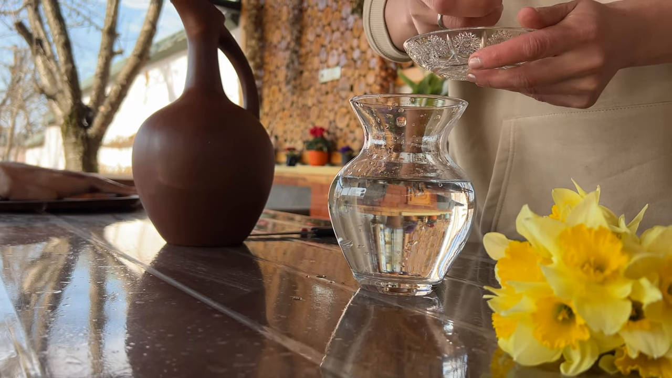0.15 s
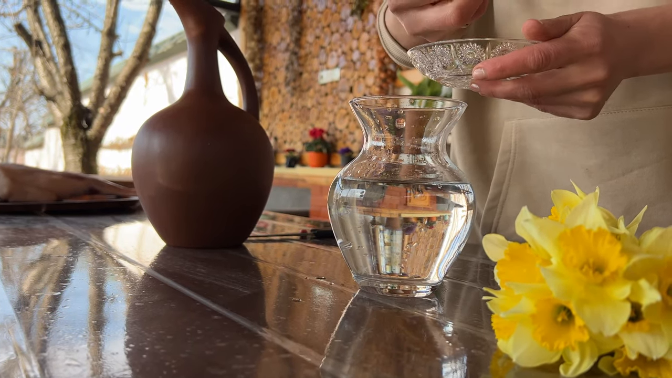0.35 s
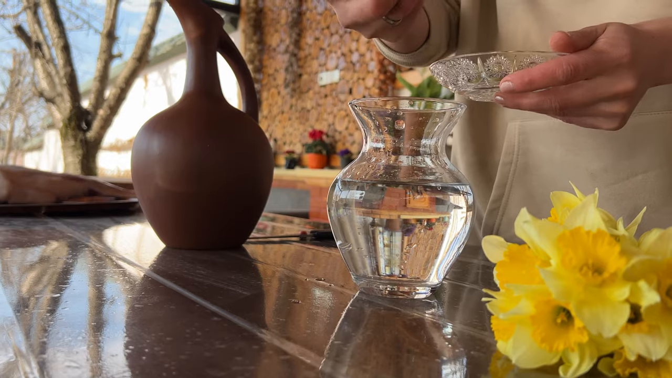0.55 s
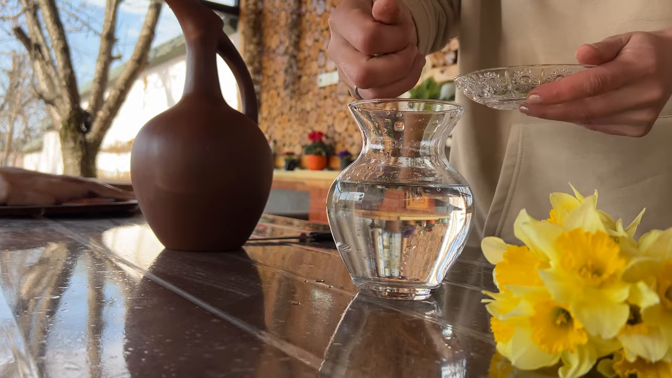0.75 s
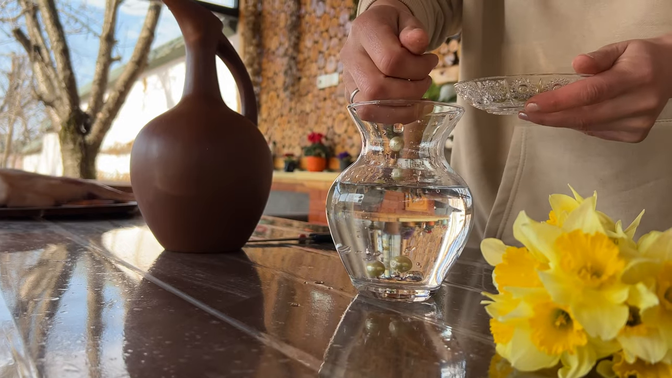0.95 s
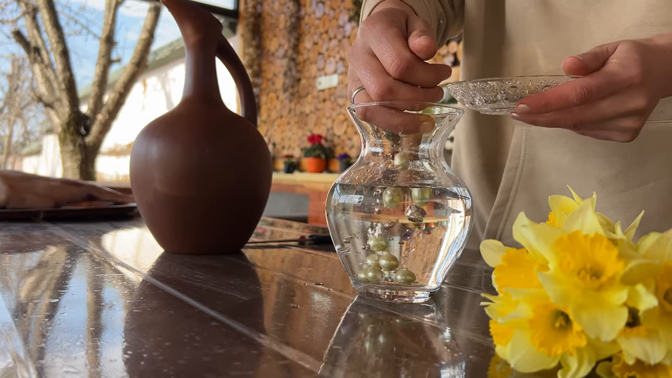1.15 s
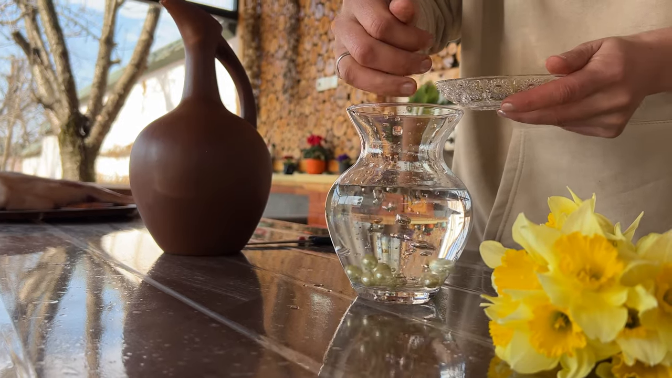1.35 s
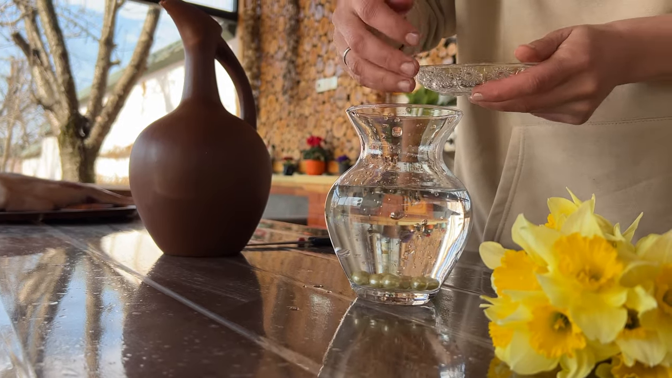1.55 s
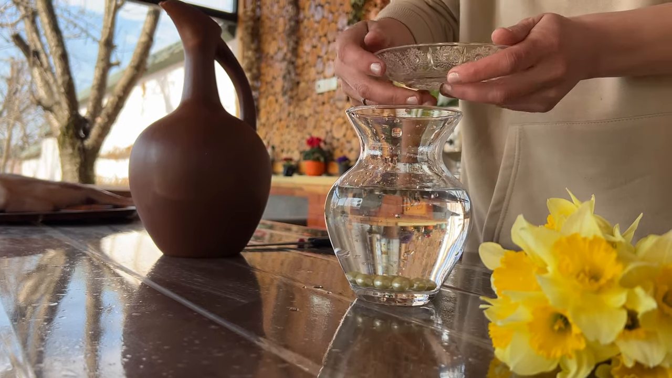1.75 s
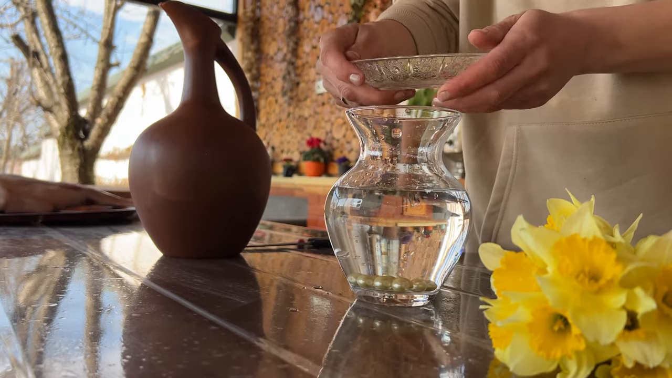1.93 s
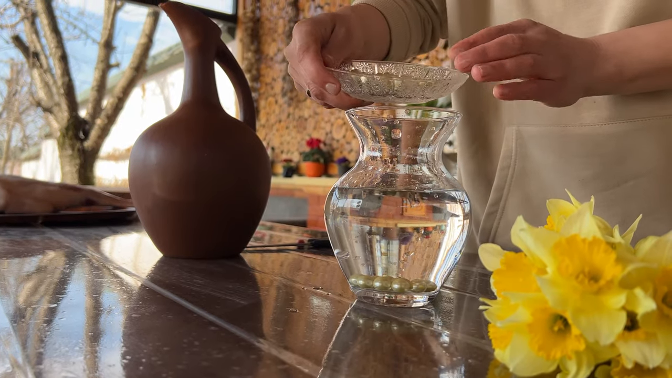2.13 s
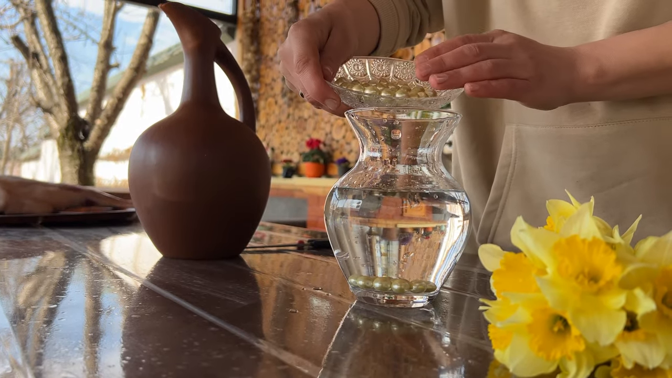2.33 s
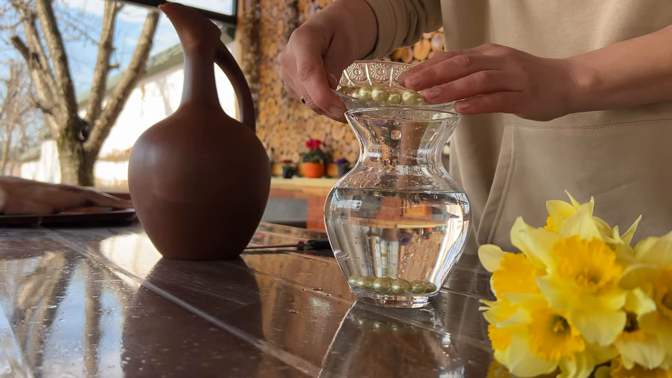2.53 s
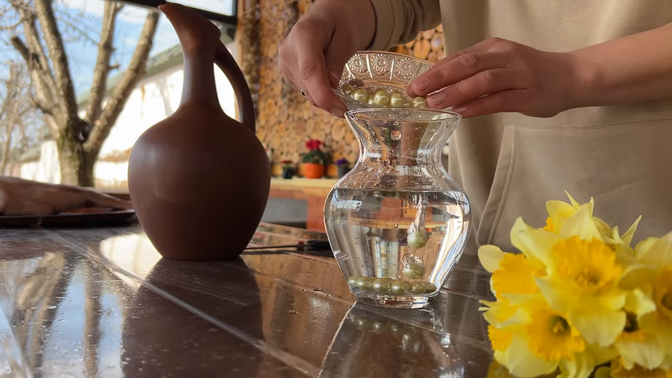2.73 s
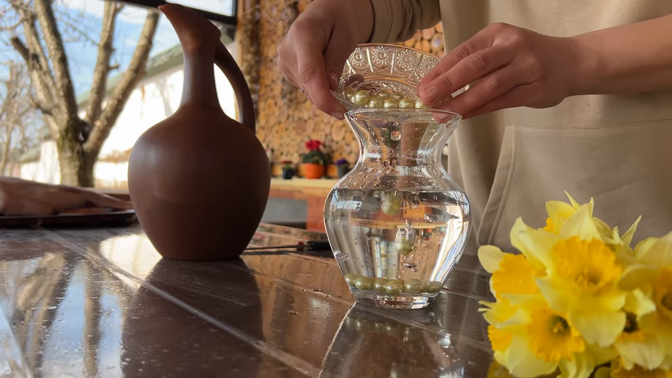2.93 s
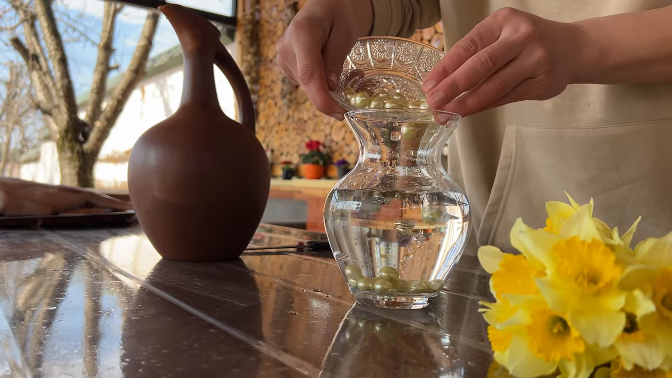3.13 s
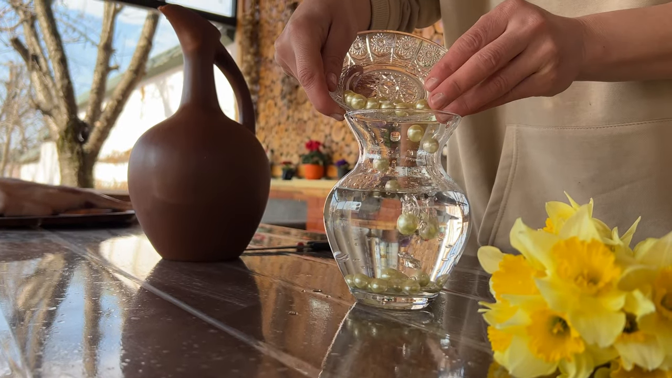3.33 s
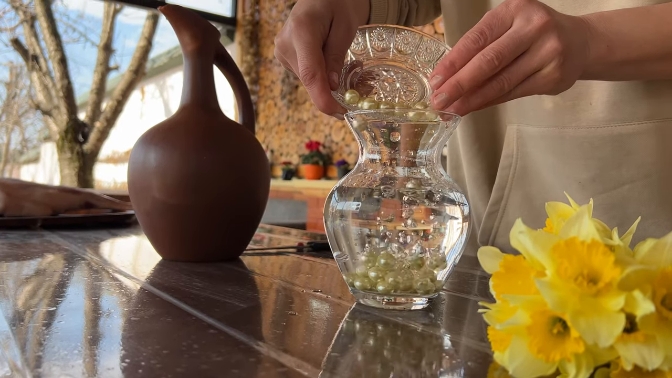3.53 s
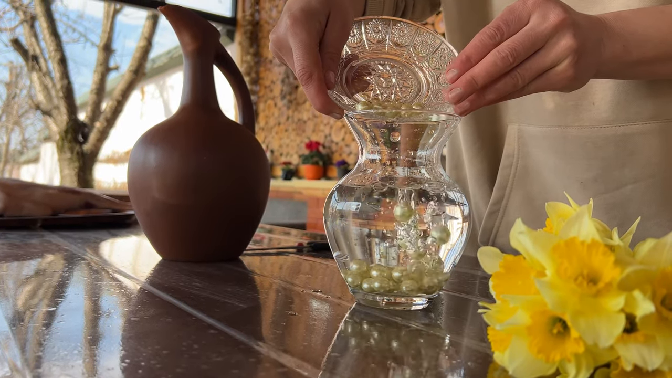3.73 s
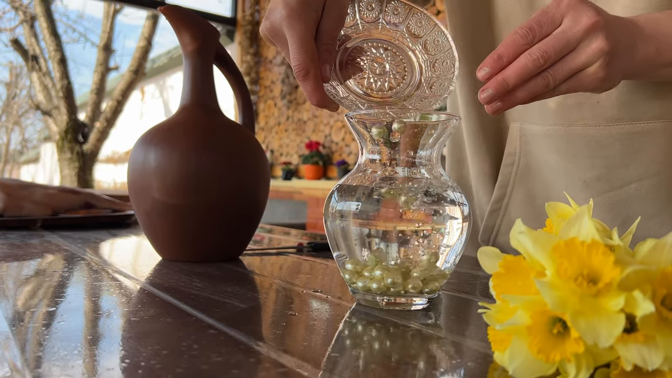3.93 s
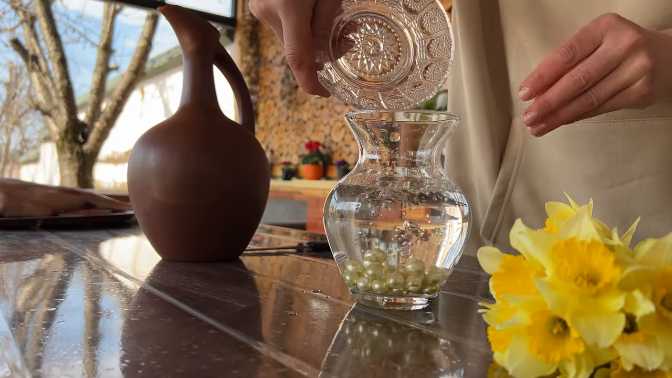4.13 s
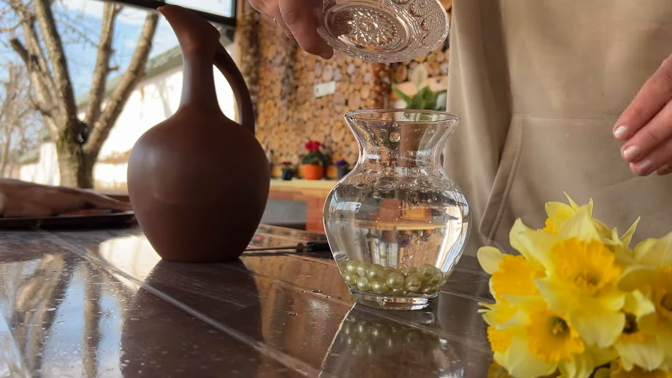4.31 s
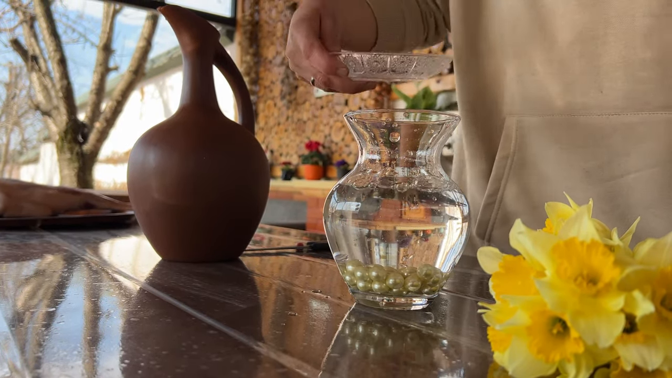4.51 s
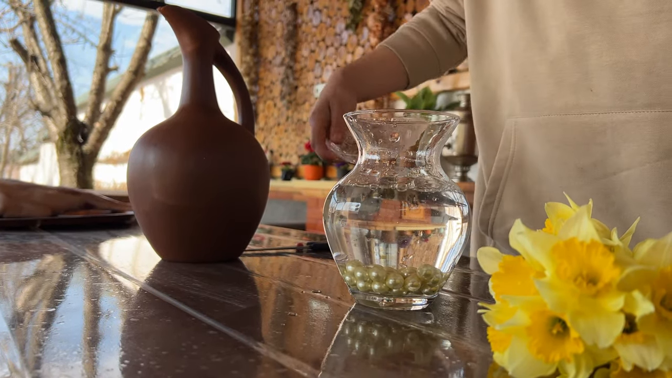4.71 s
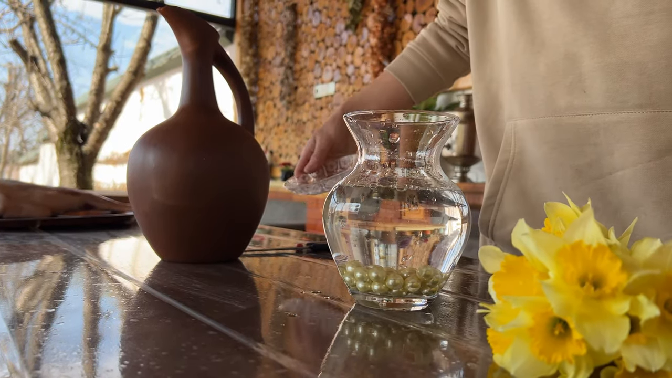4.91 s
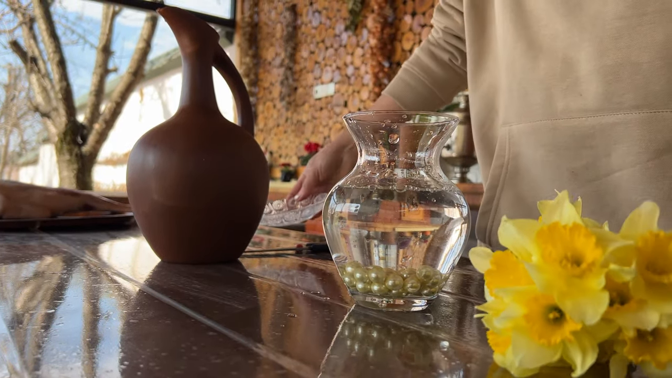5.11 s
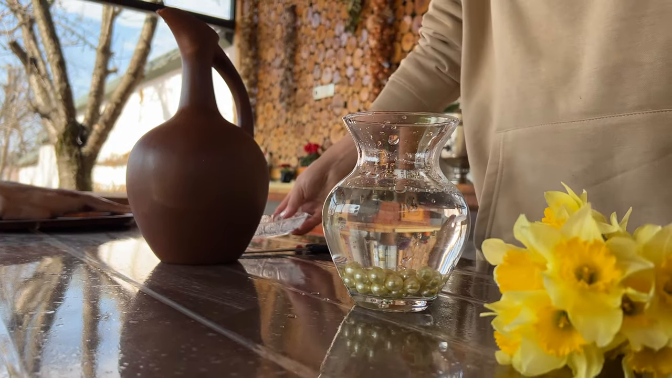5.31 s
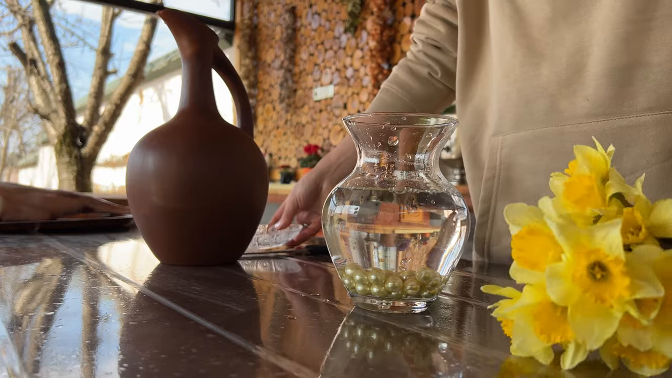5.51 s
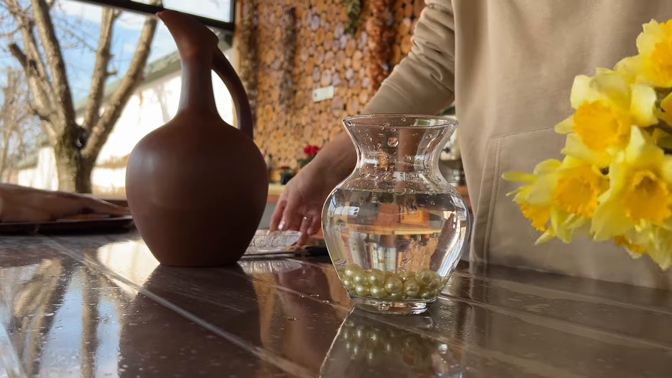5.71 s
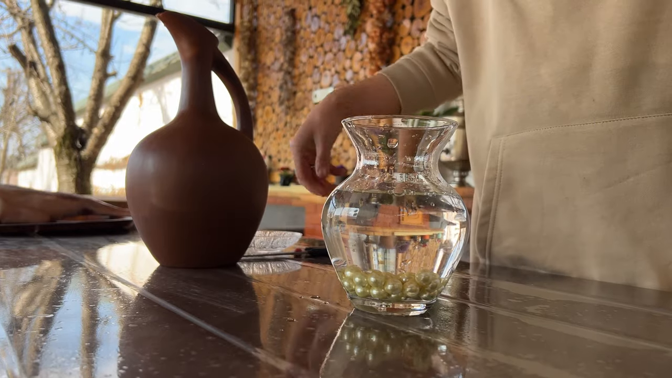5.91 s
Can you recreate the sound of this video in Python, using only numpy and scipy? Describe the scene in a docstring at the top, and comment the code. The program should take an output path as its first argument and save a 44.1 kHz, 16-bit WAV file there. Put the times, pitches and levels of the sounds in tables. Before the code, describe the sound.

Dry bead ticks and brisk dish clicks lead to a short watery clatter in a glass vase. The dish touches the lip, then a longer tumble of beads brings ringing clinks, hollow plops and fizzing bubbles. It thins to a few ticks, then a solid table knock, short scrape and faint sleeve rustle. Close microphone, short room reverberation, low distant engine hum.

```python
"""Pearl beads clicking in a small glass dish are heard first, over quiet room air and a far engine's hum.
Beads then drop into a glass vase of water, and the rest are tipped in; the dish is set down on the table.
Glass and wood sound as decaying modes behind a noise crack; bead on bead is a dry burst of noise.
Air pockets sing in the water as tones of rising pitch; rattle, churn and rustle are crowds of tiny events."""
import sys
import numpy as np
from scipy import signal
from scipy.fft import rfft, irfft, next_fast_len
from scipy.io import wavfile
from scipy.ndimage import uniform_filter1d

SR = 44100
rng = np.random.default_rng(int(sys.argv[2]) if len(sys.argv) > 2 else 0)


def persist_wave(psi):
    """Save psi, clipped to +-1, as 16-bit WAV."""
    counts = np.round(np.clip(psi, -1, 1) * 32767).astype(np.int16)
    wavfile.write(sys.argv[1], SR, np.atleast_2d(counts).T)


N = 267246
TIME = np.arange(N) / SR
RING = TIME[:SR // 4]  # time axis of one event [s]


def undb(db):
    """Level law: decibels to amplitude gain."""
    return 10 ** (np.asarray(db) / 20)


def unit(x):
    """Normalisation to an rms of 1."""
    return x / np.sqrt(np.mean(x ** 2))


def peak(x, db):
    """Onset level: the first 6 ms of a blow are scaled to the given rms level."""
    onset = x[:int(.006 * SR)]
    return x * undb(db) / np.sqrt(np.mean(onset ** 2))


def band(x, hz, kind, order=4):
    """Butterworth filtering: a maximally flat passband."""
    return signal.sosfilt(signal.butter(order, hz, kind, fs=SR, output="sos"), x)


def noise(colour, size):
    """Spectral shaping: white noise weighted by (frequency [Hz], level [dB]) points, rms 1."""
    hz, db = np.transpose(colour)
    n = next_fast_len(size)
    bins_hz = np.arange(n // 2 + 1) * SR / n
    gain = undb(np.interp(np.log1p(bins_hz), np.log1p(hz), db))
    return unit(irfft(rfft(rng.standard_normal(n)) * gain, n)[:size])


def walk(rate):
    """Random modulation: smoothed steps, `rate` of them a second, with rms 1."""
    k = int(SR / rate)
    steps = np.repeat(rng.standard_normal(N // k + 1), k)
    return unit(uniform_filter1d(steps, k)[:N])


def add(out, s, x):
    """Superposition: x is mixed in at time s."""
    i = max(int(s * SR), 0)
    out[i:i + len(x)] += x[:max(N - i, 0)]


def fade(t60):
    """Exponential decay: 60 dB of loss in t60 seconds."""
    return np.exp(-np.log(1000) * RING / t60)


CONTACT_S = .0015  # softens each onset


def strike(modes, colour, crack_db, crack_t60, scatter_db, detune=0):
    """Modal excitation: a short crack, and modes whose strengths depend on where the blow lands."""
    hz, db, t60 = np.transpose(modes)[:, :, None]
    hz = hz * (1 + detune * rng.standard_normal(hz.shape))
    size = undb(db + scatter_db * rng.standard_normal(hz.shape))
    phase = 2 * np.pi * (hz * RING + rng.random(hz.shape))
    ring = (size * fade(t60) * np.sin(phase)).sum(0)
    crack = undb(crack_db) * noise(colour, len(RING)) * fade(crack_t60)
    return (ring + crack) * (1 - fade(CONTACT_S))


def play(hits, blow, split_hz, low_db, high_db):
    """Contact hardness: it sets the treble of each blow apart from its body; low_db and high_db trim both."""
    out = np.zeros(N)
    for s, body_db, treble_db in hits:
        x = blow()
        body = peak(band(x, split_hz, "low"), body_db + low_db)
        treble = peak(band(x, split_hz, "high"), treble_db + high_db)
        add(out, s, body + treble)
    return out


def shower(blow, rate, spread_db, count=12):
    """Poisson-like arrivals: `count` event shapes at random moments and sizes, `rate` a second, rms 1."""
    out = np.zeros(N)
    for _ in range(count):
        size = undb(spread_db * (2 * rng.random(N) - 1))
        arrivals = rng.random(N) < rate / count / SR
        out += signal.oaconvolve(size * arrivals, blow())[:N]
    return unit(out)


def gestures(rows, rise_db_per_s, fall_db_per_s, axis=2):
    """Energy summation: each movement swells, holds the level in column `axis` and dies away."""
    power = np.zeros(N)
    for row in rows:
        start, length = row[0], row[1]
        early = np.maximum(start - TIME, 0)
        late = np.maximum(TIME - start - length, 0)
        power += undb(row[axis] - rise_db_per_s * early - fall_db_per_s * late) ** 2
    return np.sqrt(power)


# spectrum of the room air: (frequency [Hz], relative level [dB])
AIR_COLOUR = [(10, -27), (28, 9), (46, -12.5), (75, -18.5), (149, -24.5), (500, -31.5), (900, -30),
              (1760, -37), (4420, -51.5), (11700, -73.5)]
AIR_DB = -59.5  # level between 150 Hz and 2 kHz


def room_air():
    """Broadband noise: the room air is a steady coloured hiss whose level drifts slightly."""
    air = noise(AIR_COLOUR, N) * undb(0.43 * walk(4))
    return air * undb(AIR_DB) / np.std(band(air, [150, 2000], "band"))


# far engine rising through two gears, before random wander: (time [s], frequency [Hz], level [dB])
ENGINE_COURSE = [(0, 87.85, -65), (1.1, 98.6, -55.5), (2.2, 106, -74), (2.8, 66.5, -62.5),
                 (3.6, 71.44, -54.5), (5.1, 78.4, -50.5), (6.06, 82.1, -50)]


def far_engine():
    """Frequency modulation: a single tone follows the engine's speed, wavering in pitch and level."""
    s, hz, db = np.transpose(ENGINE_COURSE)
    pitch = np.interp(TIME, s, hz) * (1 + .035 * walk(17))
    tone = unit(np.sin(2 * np.pi * np.cumsum(pitch) / SR))
    return tone * undb(np.interp(TIME, s, db) + 1.3 * walk(17.0))


# loudest knocks of beads in the hand-held dish: (time [s], level [dB])
DISH_KNOCKS = [(0.0284, -23.5), (0.0626, -26), (0.093, -22.5), (0.1823, -20.5), (0.215, -20.5), (0.26, -23),
               (0.2787, -22.5), (0.2969, -22), (0.301, -25), (0.31, -27.5), (0.325, -26.5), (0.3381, -24),
               (0.347, -30), (0.3648, -26.5), (2.4816, -38), (2.6432, -28), (2.6682, -29.5)]
# modes of the dish: (frequency [Hz], relative level [dB], t60 [s])
DISH_MODES = [(3550, -12.5, 0.023), (5295, 6, 0.022), (5400, -4, 0.039), (8070, 6.5, 0.014),
              (11540, -1, 0.02), (13750, -6.5, 0.018)]
# spectrum of bead-on-dish contact: (frequency [Hz], relative level [dB])
DISH_CONTACT = [(300, -66), (1200, 6), (2400, -4.5), (4600, 13), (6800, -4.5), (9000, 2.5), (13000, -2.5),
                (16000, -8.5)]
# fingers stir the dish, or tilt it so that the beads slide: (start [s], length [s], level [dB])
DISH_STIRS = [(0.11, 0.012, -34), (0.25, 0.14, -42.5), (2.38, 0.066, -46.5)]
STIR_RISE_DB_PER_S, STIR_FALL_DB_PER_S = 187.5, 154


def dish():
    """Damped modes: the grip shortens the dish's ring and shifts its pitch from click to click."""
    def blow():
        return strike(DISH_MODES, DISH_CONTACT, crack_db=2.5, crack_t60=0.01, scatter_db=-3.0, detune=0.013)

    stirred = shower(blow, rate=600, spread_db=20)
    out = stirred * gestures(DISH_STIRS, STIR_RISE_DB_PER_S, STIR_FALL_DB_PER_S)
    for s, db in DISH_KNOCKS:
        add(out, s, peak(blow(), db))
    return out


# clearest ticks of bead on bead: (time [s], level [dB])
PEARL_TICKS = [(0.397, -37), (0.7206, -55), (0.917, -45.5), (1.944, -46.5), (2.0232, -51), (2.3316, -36),
               (2.475, -37), (4.3237, -46), (4.376, -46.5), (4.4168, -48)]
# spectrum of a tick: (frequency [Hz], relative level [dB])
PEARL_CONTACT = [(800, -16.5), (4000, -11.5), (9000, -4), (16000, -18.5)]


def pearls():
    """Impact without resonance: bead on bead ticks dryly, with many faint ticks as the fingers close."""
    def tick():
        return noise(PEARL_CONTACT, len(RING)) * fade(0.012)

    faint = undb(-67.5) * shower(tick, rate=120, spread_db=31.5)
    out = faint * (TIME > .4) * (TIME < 2.5)
    for s, db in PEARL_TICKS:
        add(out, s, peak(tick(), db))
    return out


def bubble(hz, swell_s, rise):
    """Bubble resonance: a pocket of air swells, rings and dies while its pitch climbs."""
    age = RING / swell_s
    pitch = hz * (1 + rise * np.tanh(age / 3))
    swell = age * np.exp(.5 - age ** 2 / 2)
    return swell * np.sin(2 * np.pi * np.cumsum(pitch) / SR)


# beads entering the water, all from the same height and so about equally loud: (time [s])
PLOP_TIMES = [0.944, 0.969, 1.2, 1.268, 2.787, 2.968, 3.002, 3.223, 3.262, 3.292, 3.352, 3.433, 3.485, 3.57,
              3.648, 3.7, 3.771, 3.942, 4.014, 4.072]
PLOP_DB = -33
POCKET_HZ = 724  # typical starting pitch of the air a bead drags under
# air pockets that pinch off and sing: (time [s], starting pitch [Hz], peak level [dB], swell time [s])
SINGING_BUBBLES = [(1.031, 787, -23, 0.013), (1.228, 2230, -41.5, 0.0078), (1.268, 803, -29.5, 0.017),
                   (2.804, 803, -21.5, 0.0055), (3.312, 2380, -40, 0.0099), (3.531, 806, -32, 0.012),
                   (3.668, 2260, -32.5, 0.012)]
# batches of beads tumble in and churn the water: (start [s], length [s], rattle level [dB], fizz level [dB])
BEAD_POURS = [(1.1, 0.012, -38.5, -48.5), (1.25, 0.033, -35, -42), (1.47, 0.081, -46, -56.5),
              (2.82, 0.51, -48.5, -63.5), (3.47, 0.32, -30, -42), (4.0, 0.064, -36.5, -42.5)]
POUR_RISE_DB_PER_S, WATER_SETTLE_DB_PER_S = 219.5, 105
# churned water: typical starting pitch, its spread (natural log), and the spatter beside each bubble
CHURN_HZ, CHURN_SPREAD, SPATTER_DB = 1046, .42, -17


def water():
    """Entrained air: each bead slaps the surface and sounds the air in the vase; bubbles follow."""
    splash = [(100, -25), (300, -23), (480, -1.5), (650, 6.5),
              (950, 13), (1400, -19.5), (2500, -9.5), (5000, -18.5)]  # (frequency [Hz], relative level [dB])

    def slap():
        return noise(splash, len(RING)) * fade(0.12)

    def small():
        hz = min(CHURN_HZ * np.exp(CHURN_SPREAD * rng.standard_normal()), 4500)
        return bubble(hz, swell_s=0.0035, rise=.1) + undb(SPATTER_DB) * slap()

    out = np.zeros(N)
    for s in PLOP_TIMES:
        hz = POCKET_HZ * np.exp(0.14 * rng.standard_normal())
        pocket = bubble(hz, swell_s=0.0035, rise=0.27)
        add(out, s, peak(pocket + undb(-8) * slap(), PLOP_DB))
    for s, hz, db, swell_s in SINGING_BUBBLES:
        add(out, s, undb(db) * bubble(hz, swell_s, rise=0.11))
    churn = shower(small, rate=420, spread_db=12.5, count=30)
    return out + churn * gestures(BEAD_POURS, POUR_RISE_DB_PER_S, WATER_SETTLE_DB_PER_S, axis=3)


# loudest clinks on the wall, before trim: (time [s], level under 9 kHz [dB], level above [dB])
WALL_CLINKS = [(0.9686, -26.5, -26), (1.0099, -24.5, -34), (1.0659, -24.5, -27.5), (1.0777, -29.5, -36),
               (1.0994, -25, -28), (1.1079, -34, -21.5), (1.218, -25, -30.5), (1.2512, -35.5, -25),
               (1.2794, -34, -27), (1.2969, -26.5, -19), (1.3567, -28, -26), (1.4106, -31, -27.5),
               (2.685, -26.5, -25.5), (2.7861, -33, -39), (2.8066, -28, -37), (2.8911, -37.5, -37.5),
               (3.0018, -25, -28), (3.0377, -33, -31.5), (3.0682, -35.5, -26.5), (3.1585, -31, -51),
               (3.2252, -26.5, -39.5), (3.3533, -25, -30), (3.3796, -25, -24.5), (3.409, -21, -23),
               (3.4718, -22.5, -37), (3.5565, -26.5, -25), (3.7009, -21.5, -32), (3.8095, -28, -39),
               (3.9435, -26.5, -31.5), (4.1223, -36, -31.5), (4.2469, -40, -39)]
# flared lip, touched by the dish, then struck by beads; before trim:
# (time [s], level under 11 kHz [dB], level above [dB])
LIP_CLINKS = [(2.533, -44, -47), (3.2807, -14, -26), (3.4379, -14, -29), (3.5687, -14, -27),
              (3.6588, -17.5, -28), (3.8235, -15, -23)]
# blows that set the whole vase singing: (time [s], mode frequency [Hz], starting amplitude [dB])
BELL_BLOWS = [(1.251, 2360, -42), (1.531, 1702, -45), (2.684, 2353, -32), (3.282, 2350, -34),
              (3.438, 2332, -38.5)]
BELL_T60_S = 0.39
# modes of the wall: (frequency [Hz], relative level [dB], t60 [s])
WALL_MODES = [(5354, 9, 0.034), (6270, -4.5, 0.083), (6860, 0, 0.048), (7340, -2.5, 0.12),
              (7400, -14.5, .07), (8520, -7.5, 0.038), (8820, -23.5, 0.1), (9600, -4, 0.037),
              (10200, -16, 0.09), (10220, -12.5, .09), (10160, -32.5, .05), (11400, -19, 0.062),
              (12270, -11, .035), (12900, -4, 0.03), (14300, 1, 0.023)]
# low bell modes, faintly woken by every clink on the wall: (frequency [Hz], relative level [dB], t60 [s])
BELL_MODES = [(1730, -32.5, 0.25), (2292, -16.5, 0.19), (2588, -13, 0.1), (4125, -32.5, 0.41)]
# modes of the lip: (frequency [Hz], relative level [dB], t60 [s])
LIP_MODES = [(4125, -6, .22), (5335, 0, .06), (5910, -3, .18), (6810, -5, .04), (7753, -5, .16),
             (10138, -5, .09), (13118, -4, .07)]
# spectrum of bead-on-vase contact: (frequency [Hz], relative level [dB])
VASE_CONTACT = [(300, -29), (1500, -10), (3600, -12.5), (5500, -3.5), (7200, 2), (9000, -7), (12000, -0.5),
                (16000, -14.5)]
POUR_SETTLE_DB_PER_S = 90.5


def vase():
    """Shell vibration: beads clink on wall and lip; the hardest blows set the whole vase singing."""
    body = WALL_MODES + BELL_MODES

    def wall():
        return strike(body, VASE_CONTACT, crack_db=10.5, crack_t60=0.025, scatter_db=7.5, detune=0.0022)

    def lip():
        return strike(LIP_MODES, VASE_CONTACT, crack_db=7.5, crack_t60=0.026, scatter_db=-0.5, detune=.001)

    def graze():
        return strike(body, VASE_CONTACT, crack_db=20, crack_t60=.011, scatter_db=4, detune=.007)

    out = play(WALL_CLINKS, wall, 9000, low_db=-1.5, high_db=-0.5)
    out += play(LIP_CLINKS, lip, 11000, low_db=-4.0, high_db=-4.5)
    for s, hz, db in BELL_BLOWS:
        add(out, s, undb(db) * fade(BELL_T60_S) * np.sin(2 * np.pi * hz * RING))
    rattle = shower(graze, rate=220, spread_db=13, count=20)
    return out + rattle * gestures(BEAD_POURS, POUR_RISE_DB_PER_S, POUR_SETTLE_DB_PER_S)


# the dish and the hand knock, before trim: (time [s], level under 1.6 kHz [dB], level above [dB])
TABLE_KNOCKS = [(4.764, -50, -69.5), (4.915, -53.5, -76.5), (5.476, -21, -20.5), (5.507, -30, -33),
                (5.606, -39.5, -66.5), (5.704, -32.5, -41.5)]
# modes of the table top: (frequency [Hz], relative level [dB], t60 [s])
TABLE_MODES = [(114, -15.5, 0.095), (377.3, -15.5, 0.13), (726, -12, 0.081)]
# spectrum of contact with the table: (frequency [Hz], relative level [dB])
TABLE_CONTACT = [(50, -22.5), (130, 5.5), (330, 5), (750, -4), (1100, -11), (3600, -17.5), (5800, -31.5),
                 (12000, -66)]
# the dish rests on the vase and presses its foot on the table: (time [s], level [dB])
FOOT_BUMPS = [(2.535, -32.5), (2.593, -38.5)]
# modes of the table under the vase's foot: (frequency [Hz], relative level [dB], t60 [s])
FOOT_MODES = [(113, -1.5, 0.13), (320, -7, 0.12), (540, -8, 0.044)]
PLOP_THUD_DB = -47.5  # each bead's thud through the foot
# the dish scrapes into place: (start [s], length [s], level [dB])
DISH_SCRAPES = [(5.595, 0.0093, -40.5), (5.67, 0.029, -35)]
SCRAPE_RISE_DB_PER_S, SCRAPE_FALL_DB_PER_S = 752, 441
# the table is leant on and rocks on its legs: (start [s], length [s], level [dB])
TABLE_SWAYS = [(1.28, 0.19, -37.5), (2.6, 2.56, -42.5), (5.55, 0.083, -28)]
SWAY_HZ, SWAY_RISE_DB_PER_S, SWAY_FALL_DB_PER_S = 26, 154, 45


def table():
    """Structure-borne sound: the top thuds and scrapes, feels beads land through the foot and rocks."""
    def blow():
        # the top's many crowded modes blur into a dull tail
        tail = undb(-14) * noise(TABLE_CONTACT, len(RING)) * fade(0.049) * (1 - fade(0.0069))
        return strike(TABLE_MODES, TABLE_CONTACT, crack_db=2.0, crack_t60=0.016, scatter_db=1.5) + tail

    def thud():
        return strike(FOOT_MODES, TABLE_CONTACT, crack_db=-7.5, crack_t60=0.032, scatter_db=0.5)

    out = play(TABLE_KNOCKS, blow, 1600, low_db=3.5, high_db=-0.5)
    scrape = shower(blow, rate=170, spread_db=7)
    out += scrape * gestures(DISH_SCRAPES, SCRAPE_RISE_DB_PER_S, SCRAPE_FALL_DB_PER_S)
    for s, db in FOOT_BUMPS:
        add(out, s, peak(thud(), db))
    for s in PLOP_TIMES:
        add(out, s, peak(thud(), PLOP_THUD_DB))
    sway_phase = 2 * np.pi * np.cumsum(SWAY_HZ + walk(5)) / SR
    rocking = unit(np.sin(sway_phase) * undb(4 * walk(7)))
    return out + rocking * gestures(TABLE_SWAYS, SWAY_RISE_DB_PER_S, SWAY_FALL_DB_PER_S)


# spectrum of the cloth: (frequency [Hz], relative level [dB])
CLOTH_COLOUR = [(500, -20), (2300, -7), (3500, 0), (6000, -10), (10000, -17), (16000, -20)]
# the sleeve brushes the apron: (start [s], length [s], level [dB])
SLEEVE_BRUSHES = [(4.88, .1, -70), (5.12, 0.67, -65.5), (5.92, 0.17, -66)]
BRUSH_RISE_DB_PER_S, BRUSH_FALL_DB_PER_S = 58, 49


def sleeve():
    """Stick-slip friction: cloth rustles as fibres catch and let go."""
    def catch():
        return noise(CLOTH_COLOUR, len(RING)) * fade(0.01)

    rustle = shower(catch, rate=1000, spread_db=8.5)
    return rustle * gestures(SLEEVE_BRUSHES, BRUSH_RISE_DB_PER_S, BRUSH_FALL_DB_PER_S)


def room(x, wet_db, t60):
    """Reverberation: a short diffuse tail that starts with the nearest surfaces, 4 ms after the sound."""
    t = TIME[:SR // 2]
    colour = [(100, 3), (1000, 6), (6000, -3.0), (16000, -7.0)]  # (frequency [Hz], relative level [dB])
    tail = noise(colour, len(t)) * np.exp(-np.log(1000) * t / t60) * (t > .004)
    return x + undb(wet_db) * signal.oaconvolve(x, tail / np.linalg.norm(tail))[:N]


def scene():
    """Superposition: everything on the table sounds into the room, over air, engine and sleeve."""
    background = room_air() + far_engine() + sleeve()
    on_table = dish() + pearls() + water() + vase() + table()
    return (room(on_table, wet_db=-16.0, t60=0.28) + background)[None]


def record(dry):
    """Band limiting: the recorder cuts the very top, above 16 kHz."""
    return signal.sosfilt(signal.ellip(8, .2, 70, 16000, fs=SR, output="sos"), dry)


dry = scene()
out = record(dry)
persist_wave(out)
```